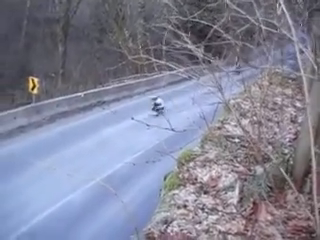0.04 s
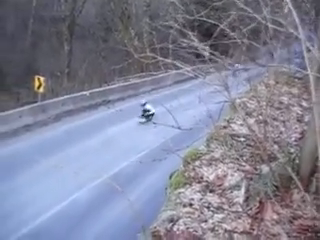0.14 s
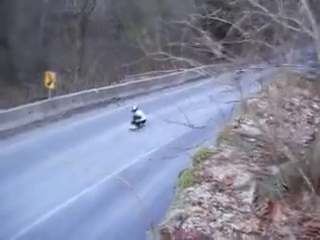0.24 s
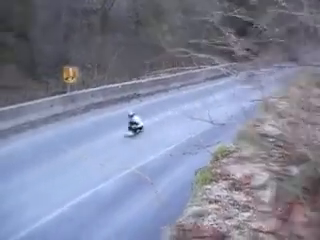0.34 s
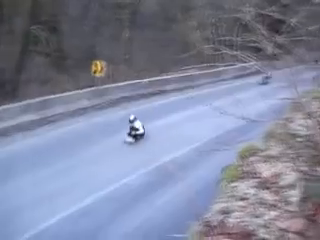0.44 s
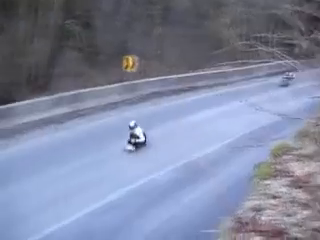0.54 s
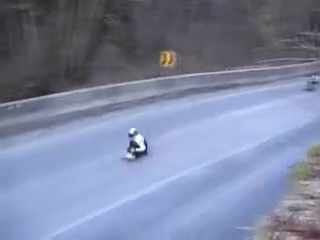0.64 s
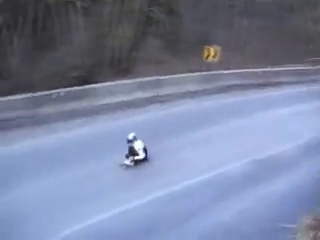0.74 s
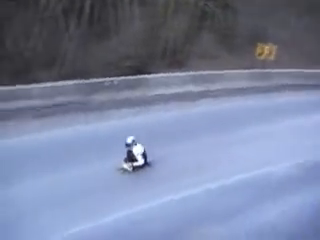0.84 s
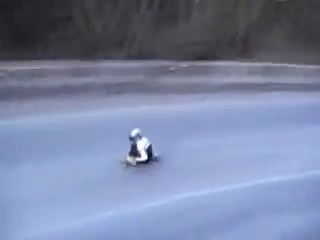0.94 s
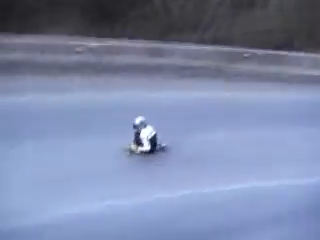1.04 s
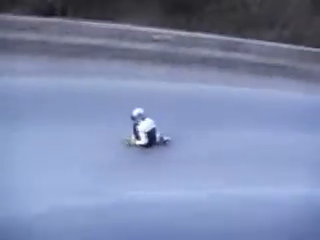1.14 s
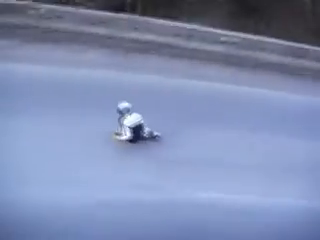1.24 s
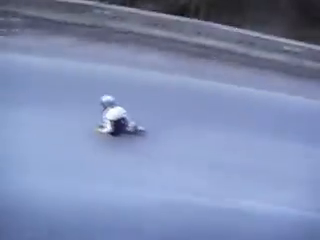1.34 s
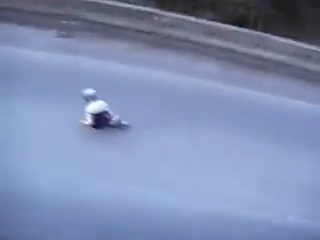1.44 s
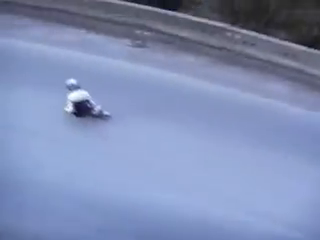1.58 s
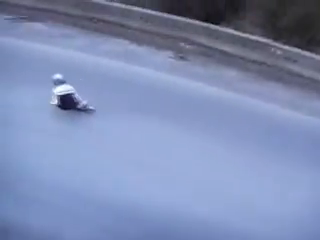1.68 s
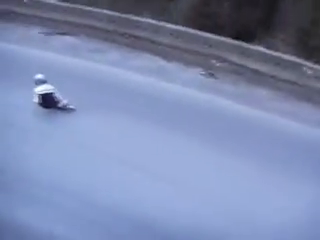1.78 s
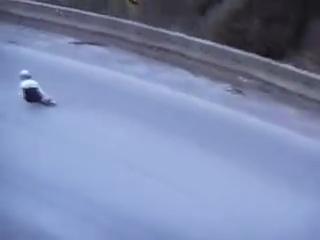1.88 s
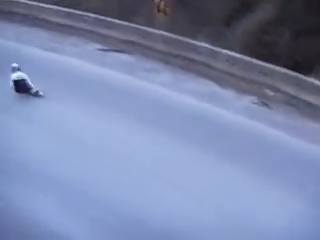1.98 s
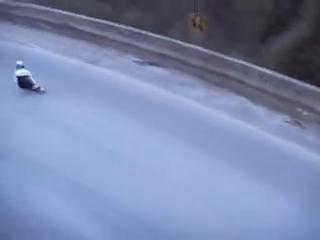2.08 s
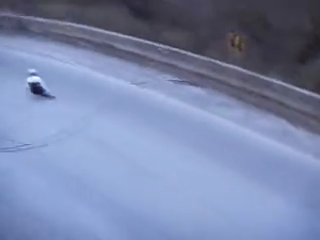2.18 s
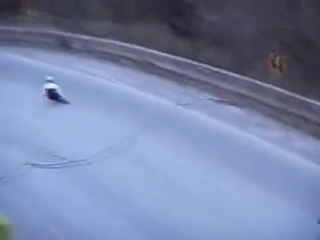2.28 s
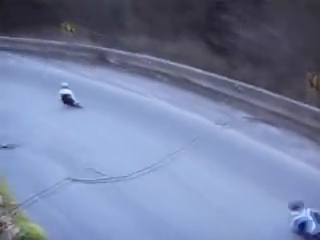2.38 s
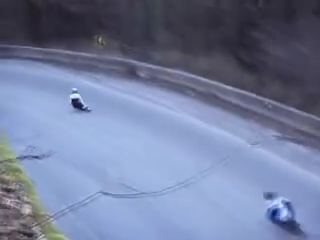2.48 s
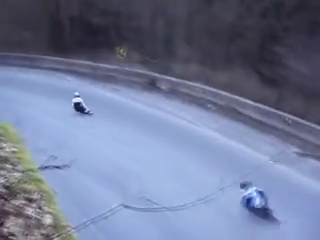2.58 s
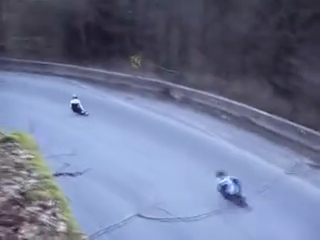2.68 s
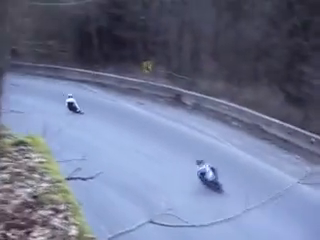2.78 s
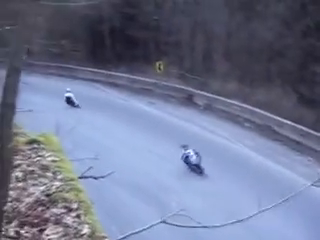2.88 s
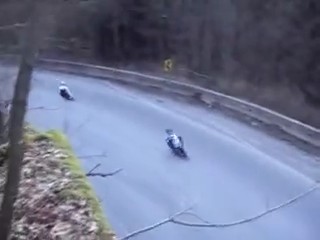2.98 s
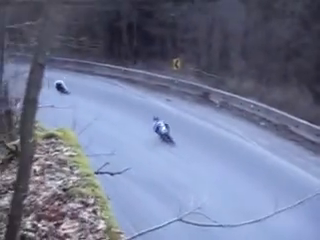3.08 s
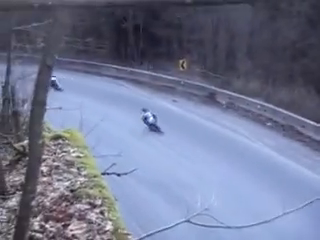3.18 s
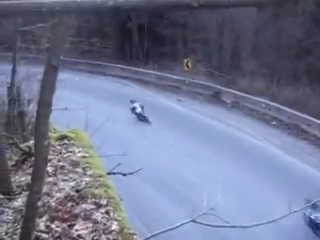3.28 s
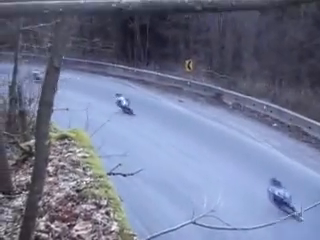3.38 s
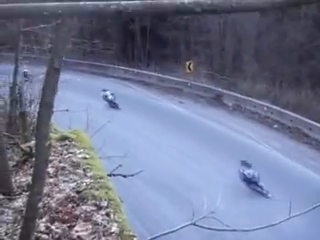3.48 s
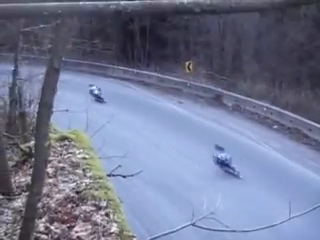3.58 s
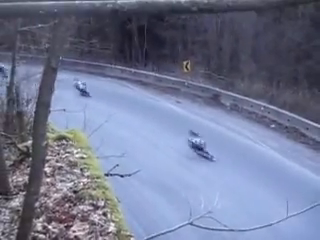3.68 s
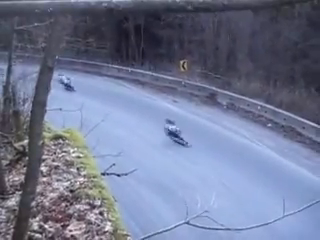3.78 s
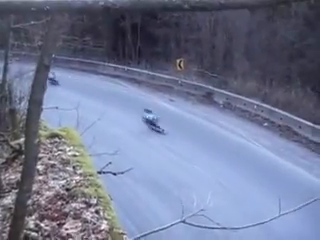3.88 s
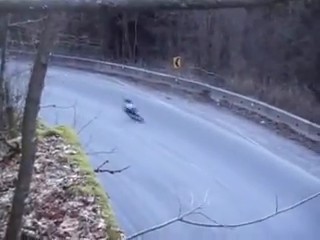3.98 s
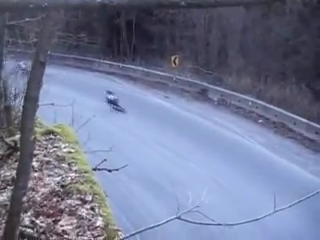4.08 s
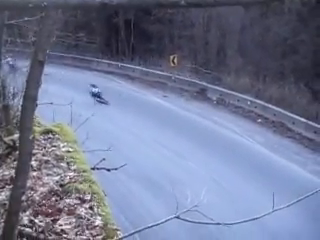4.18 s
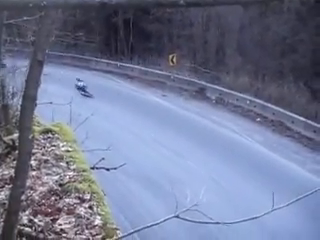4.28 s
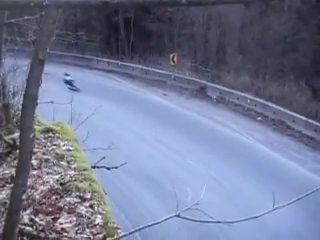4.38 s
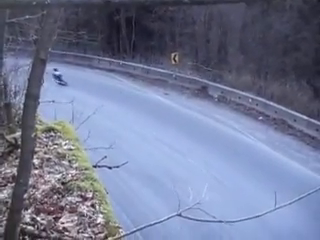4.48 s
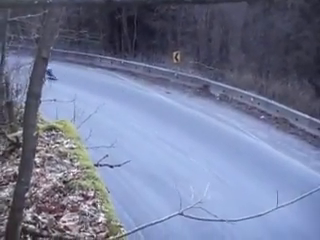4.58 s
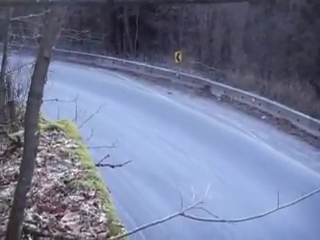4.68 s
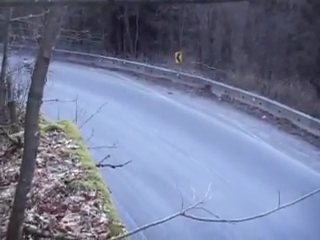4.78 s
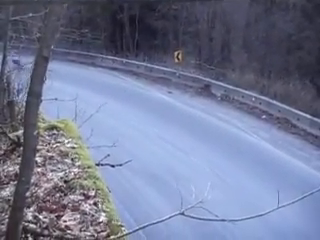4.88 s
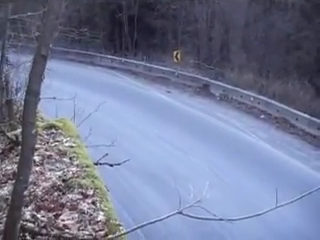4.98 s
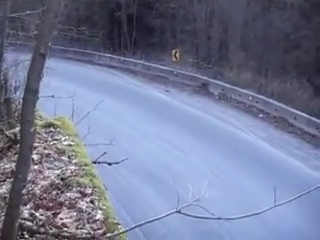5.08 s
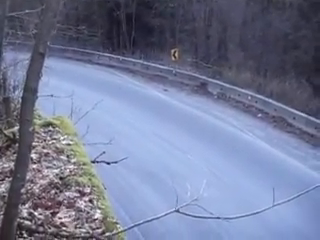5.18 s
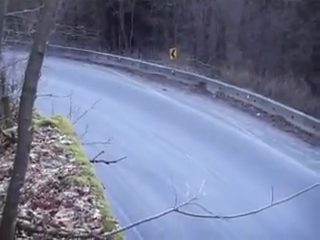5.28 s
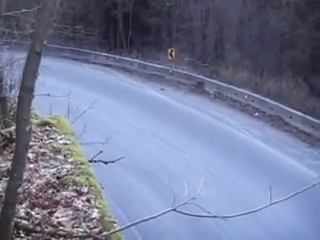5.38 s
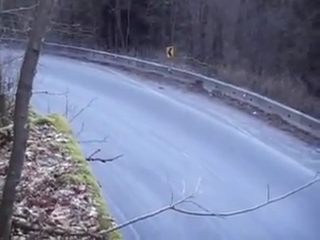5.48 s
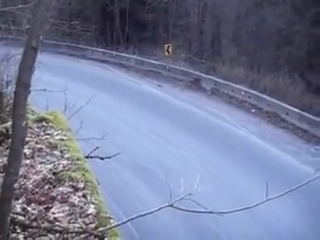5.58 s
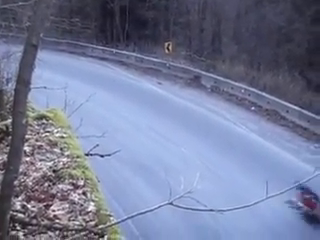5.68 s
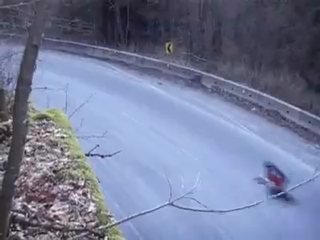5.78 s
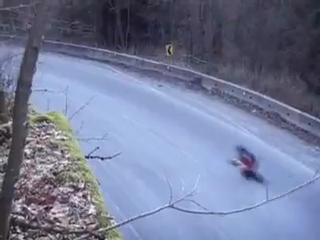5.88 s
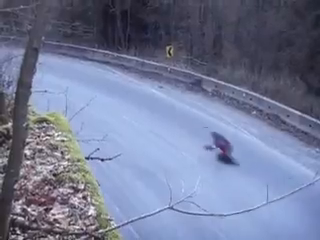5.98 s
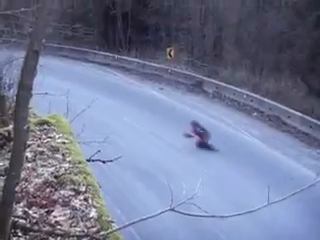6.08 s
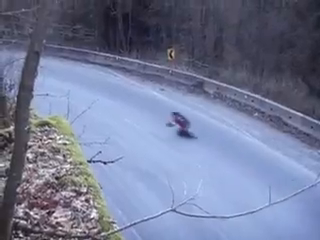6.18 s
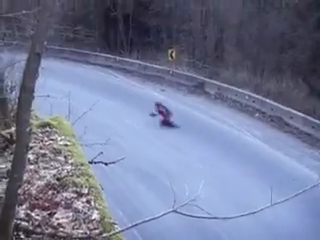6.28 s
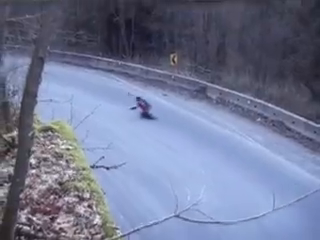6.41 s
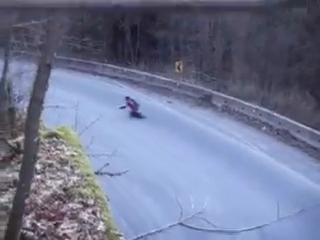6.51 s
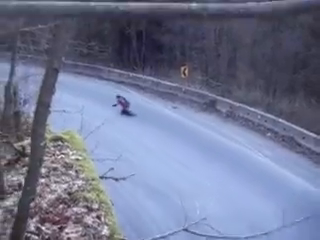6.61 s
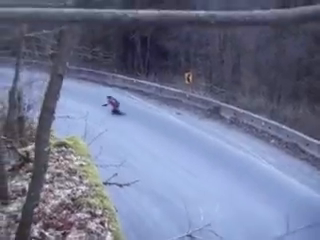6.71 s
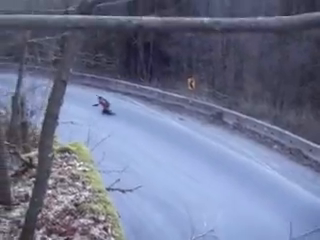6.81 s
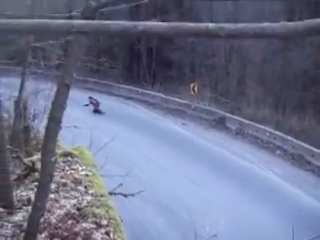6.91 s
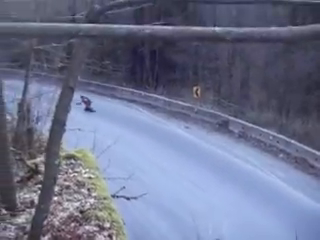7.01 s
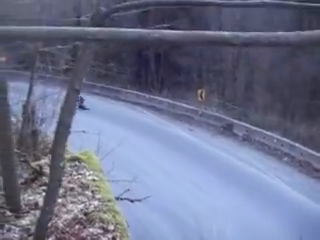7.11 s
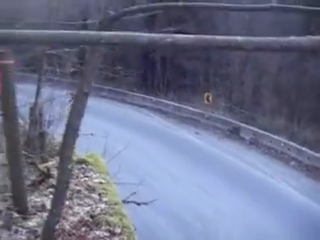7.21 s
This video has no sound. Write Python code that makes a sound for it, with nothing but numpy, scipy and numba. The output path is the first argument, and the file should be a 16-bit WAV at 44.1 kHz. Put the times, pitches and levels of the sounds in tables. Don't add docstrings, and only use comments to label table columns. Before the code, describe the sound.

Continuous rolling noise outdoors by a road: small wheels hissing and rumbling over coarse asphalt. It begins bright and hissy, grows fuller and louder as riders pass, sinks, then a single board comes by with a hollow hum and a burst of stone clicks before fading. Nearly mono small microphone, bright around the upper treble, weak low end, almost no room echo.

```python
import sys
import numpy as np
from scipy import signal
from scipy.fft import rfft, irfft, dct
from scipy.io import wavfile
from scipy.ndimage import uniform_filter1d
from numba import njit

SR = 44100
rng = np.random.default_rng(int(sys.argv[2]) if len(sys.argv) > 2 else 0)


def output_pcm(signal):
    pcm = np.clip(np.atleast_2d(signal).T, -1, 1) * 32767
    wavfile.write(sys.argv[1], SR, np.round(pcm).astype(np.int16))


def boost(x):
    u = np.asarray(x, float) / 20
    return 10 ** u


N = 319725
T = np.arange(N) / SR


def unit(x):
    return x / np.sqrt(np.mean(x ** 2))


@njit
def svf(x, hz, width):
    y, b, l = np.empty(len(x)), 0., 0.
    for i in range(len(x)):
        g, k = np.tan(np.pi * hz[i] / SR), width / hz[i]
        v = (b + g * (x[i] - l)) / (1 + g * (g + k))
        b, l, y[i] = 2 * v - b, l + 2 * g * v, k * v
    return y


def resonate(x, hz, width):
    return unit(svf(svf(x, hz, width), hz, width))


def colour(x, points):
    hz, db = np.transpose(points)
    at = np.log(np.maximum(np.arange(N // 2 + 1) * SR / N, 1))
    skirt_db = -25 * np.maximum(np.log(hz[0]) - at, 0) - 30 * np.maximum(at - np.log(hz[-1]), 0)
    return unit(irfft(rfft(x) * boost(np.interp(at, np.log(hz), db) + skirt_db), N))


def walk(rate):
    k = int(SR / rate)
    held = np.repeat(rng.standard_normal(N // k + 1), k)
    return 1.2 * uniform_filter1d(uniform_filter1d(held, k), k)[:N]


def bell(s, length):
    return np.cos(np.pi * np.clip((T - s) / length, -.5, .5)) ** 2


def asphalt(grains_hz, spread_db, smooth):
    chance, size = rng.random((N, 2)).T
    height = boost(spread_db * np.minimum(-np.log(1 - size), 4.5))
    tips = (chance < grains_hz / SR) * height * rng.standard_normal(N)
    return unit(tips) * (1 - smooth) + smooth * rng.standard_normal(N)


def ring(modes, flicker_db, tilt_db=0):
    out = 0
    for k, (hz, width, db) in enumerate(modes):
        road = asphalt(grains_hz=3892, spread_db=-0.5, smooth=0.71)
        centre = hz * (1 + 0.019 * walk(2.93))
        lean_db = tilt_db * (2 * k / (len(modes) - 1) - 1)
        level = boost(db + lean_db + flicker_db * walk(9))
        out = out + level * resonate(road, centre, 1.7 * width)
    return unit(out)


def deck(hz, width_hz, core_db):
    road, other_truck = (asphalt(grains_hz=3037, spread_db=-0.5, smooth=0.76) for _ in range(2))
    broad = resonate(road, hz, 1.6 * width_hz)
    core = resonate(other_truck, hz, 2.5 * 70)
    return unit(broad + boost(core_db) * core)


# f/Hz, density level/dB per Hz
GRIT_SPECTRUM = [(2470, -41), (4200, -7), (6230, -1.5), (7950, -13.5), (9110, -15.5), (11200, -29),
                 (12400, -33.5), (16100, -69), (22000, -120)]
# t/s, length/s, extra sheen level/dB
DUST = [
    (.95, 0.71, 3.5),
    (3.75, 1.26, 2),
    (5.937, 1.1, 3.5),
]


def grit():
    split = dict(N=4, Wn=7490, fs=SR, output="sos")
    coarse = colour(asphalt(grains_hz=2563, spread_db=2.0, smooth=0.63), GRIT_SPECTRUM)
    coarse = signal.sosfilt(signal.butter(btype="low", **split), coarse)
    fine = colour(asphalt(grains_hz=3940, spread_db=4.0, smooth=0.54), GRIT_SPECTRUM)
    fine = signal.sosfilt(signal.butter(btype="high", **split), fine)
    dust_db = sum(db * bell(s, length) for s, length, db in DUST)
    sheen_db = -0.2 - 0.75 * AIM_DB - 0.062 * BEARING_DB + dust_db + 0.66 * walk(6)
    return boost(0.5 * walk(11)) * (coarse * boost(.5 * walk(9)) + fine * boost(sheen_db))


# f/Hz, density level/dB per Hz
RUMBLE_SPECTRUM = [(53, -66), (90, -79), (110, -12), (135, -17.5), (248, -7), (350, -6), (480, -3),
                   (620, -14.5), (1060, -120)]


def rumble(hum_db):
    return colour(rng.standard_normal(N), RUMBLE_SPECTRUM) * boost(-14.5 + 0.37 * hum_db + 0.2 * AIM_DB)


# t/s, length/s, extra hum level/dB
LEANS = [
    (1.213, 0.22, 5),
    (1.493, .25, 4),
    (2.545, 0.27, 2),
    (3.31, 0.46, 2.5),
    (4.797, 0.48, 8),
    (5.088, 0.47, 6.5),
    (5.232, 0.18, 2.5),
    (5.857, .6, 2.5),
    (6.862, 0.25, 1.5),
]


def lean():
    return sum(db * bell(s, length) for s, length, db in LEANS)


# t/s, rolling level/dB, treads aimed at the microphone level/dB, off its axis level/dB
RIDE = [(0, -44, 6.5, 1), (.8, -39.5, 6, 1), (1.2, -37, 4.5, 1.5), (1.95, -34.5, 0, 1), (2.4, -35.5, 1, .5),
        (2.75, -34, -1.5, 0), (3.3, -37, 1, -2.5), (3.56, -35.5, -0.5, -0.5), (3.8, -39.5, 1.5, -2),
        (4.1, -40, 2.5, -12), (4.45, -43, 3, -6.5), (5.03, -42, 2.5, 2), (5.201, -39.5, 1.1, 2.5),
        (5.55, -40, -2.5, 3), (6.1, -39.5, -2, -0.5), (6.5, -41, -1, -6.5), (6.85, -45, 1.5, -5.5),
        (7.25, -47, 1.5, -7)]
LEVEL_DB, AIM_DB, BEARING_DB = (np.interp(T, np.array(RIDE)[:, 0], c) for c in np.array(RIDE)[:, 1:].T)


def boards(wheels, axles, deck_hz, deck_width_hz, core_db, hum_db, buzz_db):
    patch_db = 0.5 * walk(9)
    hum_db = hum_db - 0.46 * AIM_DB + lean()
    buzz_db = buzz_db + 0.71 * AIM_DB + 0.15 * BEARING_DB
    roar = ring(wheels, flicker_db=1.0)
    hum = deck(deck_hz * (1 + 0.021 * walk(5)), deck_width_hz, core_db)
    buzz = ring(axles, flicker_db=0.77, tilt_db=-0.33 + 0.067 * BEARING_DB)
    hiss = boost(AIM_DB) * grit()
    rolling = roar + boost(hum_db) * hum + boost(buzz_db) * buzz + hiss + rumble(hum_db)
    return boost(LEVEL_DB + patch_db) * rolling


# f/Hz, width/Hz, level/dB
GROUP_WHEELS = [(859, 350, -12.5), (1069, 340, 2), (1475, 260, -1), (1840, 344, -0.5)]
GROUP_AXLES = [(2418, 1030, 0.23), (3200, 1070, -0.49), (3930, 1630, -1)]


def group_riders():
    return boards(GROUP_WHEELS, GROUP_AXLES, deck_hz=612.3, deck_width_hz=222, core_db=-13.5,
                  hum_db=-8, buzz_db=-3)


# t/s, length/s, from f/Hz, to f/Hz, share removed (0-1)
HOLLOWS = [
    (0.453, 1.1, 3500, 4400, 0.3),
    (3.505, 1.4, 4700, 4000, 0.44),
    (4.246, 1.4, 4280, 3600, 0.26),
    (6.605, 2.5, 4480, 3320, 0.46),
]


def hollow(x):
    for s, length, from_hz, to_hz, share in HOLLOWS:
        hz = np.interp(T, (s - length / 2, s + length / 2), (from_hz, to_hz))
        x = x - np.clip(share, 0, 1) * bell(s, length) * svf(x, hz, 1440.)
    return x


# t/s, length/s, low f/Hz, high f/Hz, level re middle/dB
FLASHES = [
    (0.684, 0.028, 5300, 8500, 0),
    (2.58, 0.063, 470, 576, -16),
    (4.075, .027, 5330, 9000, -2),
    (4.354, .026, 4600, 5800, 1),
    (4.864, .028, 4600, 5800, -1),
    (4.878, 0.41, 560, 715, -21),
    (5.47, 0.054, 600, 720, -17),
    (5.98, .026, 6900, 8300, 1),
]


def flashes(side, other):
    for s, length, low_hz, high_hz, db in FLASHES:
        span = slice(int(s * SR), int((s + length) * SR))
        passband = signal.butter(4, (low_hz, high_hz), "band", fs=SR, output="sos")
        band = signal.sosfiltfilt(passband, other[span])
        side[span] += boost(db) * band * signal.windows.tukey(len(band), .5)
    return side


# t/s, half length/s, f/Hz, width/Hz, level/dB
SLIDES = [(0.973, 0.1, 616, 100, -46.5), (4.76, .07, 654, 70.4, -48.5), (1.13, 0.033, 513, 150, -42),
          (1.359, 0.049, 642, 119, -38.5), (2.126, 0.089, 1700, 250, -39), (2.748, 0.21, 507, 129.5, -44.5),
          (2.749, 0.4, 1140, 253, -44.5), (3.552, 0.39, 3080, 400, -43.5), (4.61, 0.26, 950, 450, -45),
          (1.55, 0.16, 5530, 1200, -35.5), (1.89, 0.25, 5270, 900, -38.5), (3.647, 0.027, 1330, 500, -38),
          (4.964, 0.18, 643, 59.6, -38), (5.185, 0.041, 1590, 454, -38), (5.274, 0.013, 900, 704, -46),
          (5.805, 0.1, 3200, 200, -46.5), (6.33, 0.12, 1700, 180, -44.5), (6.747, 0.13, 920, 120, -52.5),
          (6.89, 0.056, 600, 59.5, -50.5), (7.033, 0.053, 1870, 120, -48), (7.058, 0.089, 5670, 1200, -44),
          (7.1, 0.086, 448, 150, -57)]


def slides():
    out, road = np.zeros(N), rng.standard_normal(N)
    for s, length, hz, width, db in SLIDES:
        span = slice(int((s - length) * SR), int((s + length) * SR))
        centre = np.full(len(road[span]), 1. * hz)
        out[span] += boost(db) * resonate(road[span], centre, 1.8 * width) * np.hanning(len(centre))
    return out


# t/s, peak level/dB, ring f/Hz, ring time/s
STONES = [(2.3635, -14, 7600, .003), (2.3745, -13.5, 8400, 0.002), (2.3772, -19, 6000, 0.007),
          (3.8955, -23, 6100, .004), (6.4127, -18, 6030, 0.003), (6.8109, -28, 6030, .004),
          (7.052, -30, 5600, .008), (5.2234, -19, 6000, .003), (5.2249, -14, 6000, .0035),
          (5.2247, -23, 2000, .006), (5.2256, -25, 5000, .035), (5.2273, -21, 5300, .005),
          (5.2295, -21, 5000, .004), (5.237, -18, 5600, .003), (5.2388, -22, 4800, .014)]


def stones():
    out, age = np.zeros(N), np.arange(2000) / SR
    decay = -np.log(1000) * age
    rise = 1 - np.exp(-age / 0.000063)
    for (s, db, hz, t60), noise in zip(STONES, rng.standard_normal((len(STONES), len(age)))):
        spray = resonate(noise, np.full(len(age), 1.06 * hz), 3000.) * np.exp(decay / .004)
        tone = np.sin(2 * np.pi * hz * age)
        click = (0.78 * tone + .5 * spray) * rise * np.exp(decay / max(t60, .001))
        at = int(s * SR)
        out[at:at + len(age)] += boost(db) * click
    return signal.sosfilt(signal.butter(3, 9000, fs=SR, output="sos"), out)


# f/Hz, width/Hz, level/dB
LAST_WHEELS = [(900, 83, -9.5), (1200, 490, 1), (1443, 220, -4.5), (1804, 430, 1.5)]
LAST_AXLES = [(2150, 420, -2.5), (2980, 750, 2), (3860, 850, -2)]


def last_rider():
    return boards(LAST_WHEELS, LAST_AXLES, deck_hz=619, deck_width_hz=LAST_DECK_WIDTH_HZ, core_db=-0.5,
                  hum_db=-5.5, buzz_db=-2.5)


LAST_DECK_WIDTH_HZ = 210
HANDOVER_S = 4.3, 4.6


def scene():
    turn = np.interp(T, HANDOVER_S, (0, np.pi / 2))
    rolling = np.cos(turn) * group_riders() + np.sin(turn) * last_rider()
    mono = hollow(rolling) + slides() + stones()
    return np.array([mono, mono])


STORE_EDGES_HZ = [100, 200, 300, 400, 510, 630, 770, 920, 1080, 1270, 1480, 1720, 2000, 2320, 2700, 3150,
                  3700, 4400, 5300, 6400, 7700, 9500, 12000]
# f/Hz, level/dB
STORE_STEP = [(100, -2.3), (920, -2.3), (1080, .5), (2000, -.4), (3150, -2.2), (5300, -3.6), (9500, -3.4)]
# t/s, extra step level/dB
STORE_SQUEEZE = [(0, -1), (2.1, -1.4), (2.8, -.5), (3, 1), (4, 1.7), (5.2, -.7), (5.9, .6), (6.6, 1.5)]


def store(mid, side):
    hop, start = 2048, 320
    at, bins = np.arange(2 * hop), np.arange(hop)
    window = np.sin(np.pi * (at + .5) / (2 * hop))
    starts, lead = np.arange(N // hop + 2) * hop, hop - start
    padded = np.pad([mid, side], ((0, 0), (lead, 3 * hop)))
    a, b, c, d = np.split(window * padded[:, starts[:, None] + at], 4, axis=2)
    folded = np.concatenate([-c[..., ::-1] - d, a - b[..., ::-1]], axis=2)
    cells = dct(folded, type=4, norm="ortho")

    edges = np.round(np.array(STORE_EDGES_HZ) * 2 * hop / SR).astype(int)
    power = [np.mean(cells[0][:, low:high] ** 2, axis=1) + 1e-12 for low, high in zip(edges, edges[1:])]
    band_db = 10 * np.log10(power)
    step_db = (band_db + band_db[3:].mean(axis=0)) / 2
    step_db = step_db + np.interp(STORE_EDGES_HZ[:-1], *np.transpose(STORE_STEP))[:, None]
    step_db = step_db + np.interp((starts + start) / SR, *np.transpose(STORE_SQUEEZE))
    step_db = step_db + .4 * rng.standard_normal(step_db.shape)
    band = np.clip(np.searchsorted(edges, bins, "right") - 1, 0, len(step_db) - 1)
    step = boost(step_db[band]).T

    a, b = np.split(dct(np.round(cells / step) * step, type=4, norm="ortho"), 2, axis=2)
    frames = window * np.concatenate([b, -b[..., ::-1], -a[..., ::-1], -a], axis=2)
    joined = frames[:, 1:, :hop] + frames[:, :-1, hop:]
    return np.concatenate([frames[:, 0, :hop], joined.reshape(2, -1)], axis=1)[:, lead:lead + N]


def roll_off(x):
    return signal.sosfilt(signal.butter(12, 12590, fs=SR, output="sos"), x)


def record(dry):
    mid = signal.sosfilt(signal.cheby2(6, 30, 98, "high", fs=SR, output="sos"), dry[0])
    other = np.roll(mid, 900)
    like = 0.55
    apart = boost(BEARING_DB) * (like * mid + np.sqrt(1 - like ** 2) * other)
    top_octave = signal.butter(3, (8900, 12200), "band", fs=SR, output="sos")
    mid, side = store(mid, boost(-2) * signal.sosfiltfilt(top_octave, apart))
    side = flashes(side, other)
    return roll_off(mid + np.array([side, -side]))


dry = scene()
out = record(dry)
output_pcm(out)
```